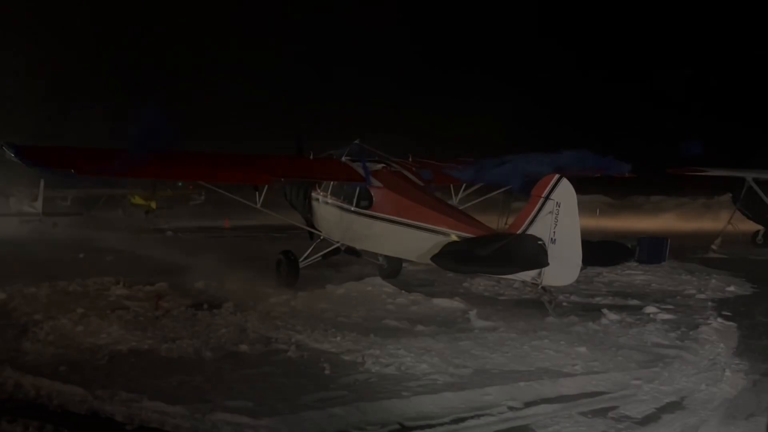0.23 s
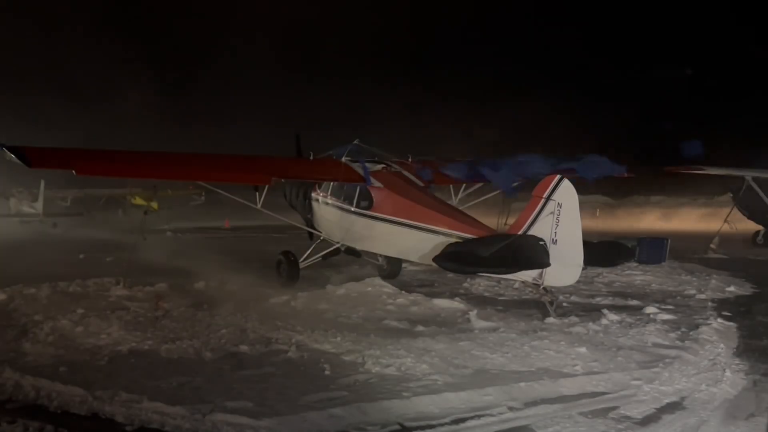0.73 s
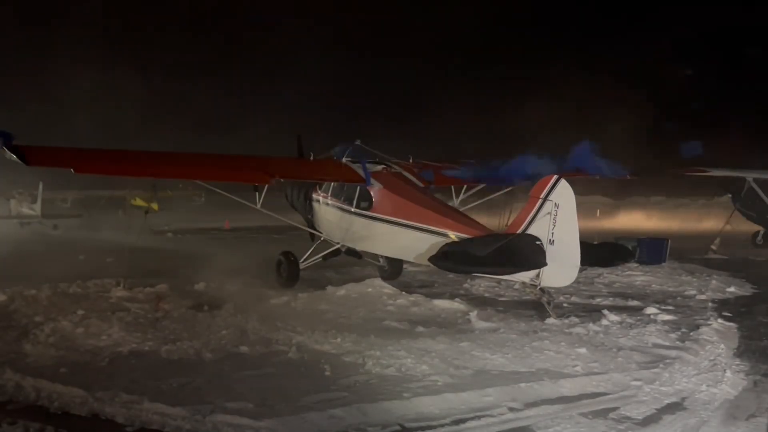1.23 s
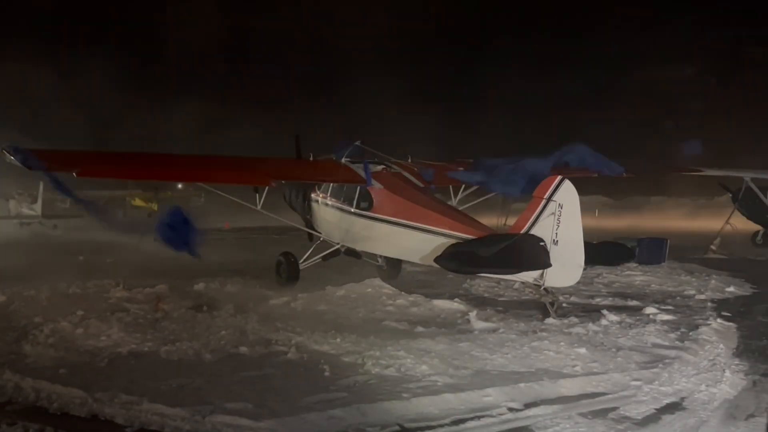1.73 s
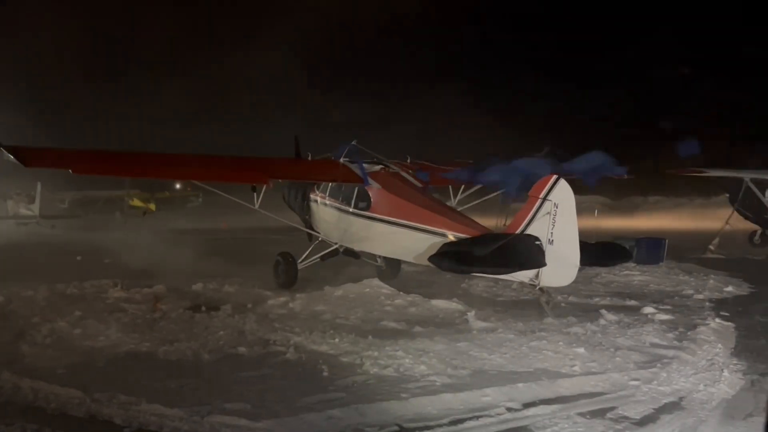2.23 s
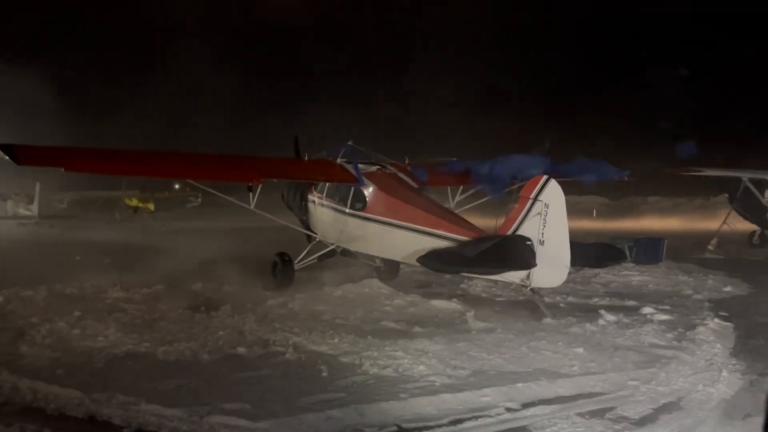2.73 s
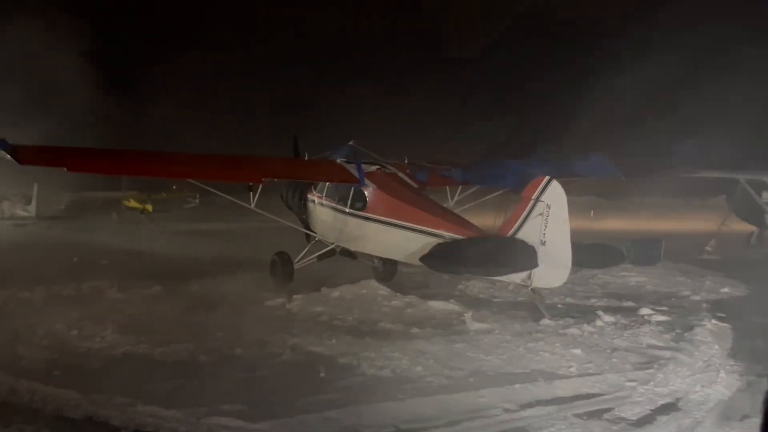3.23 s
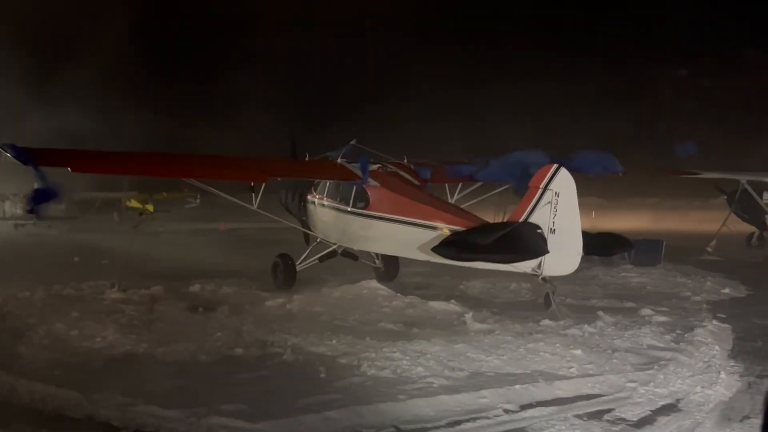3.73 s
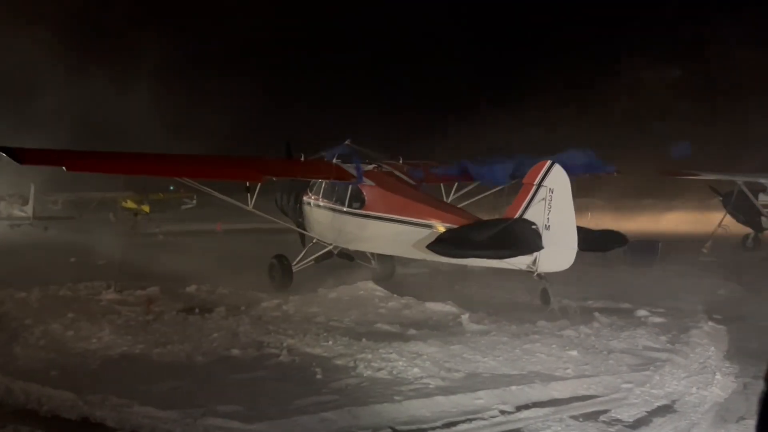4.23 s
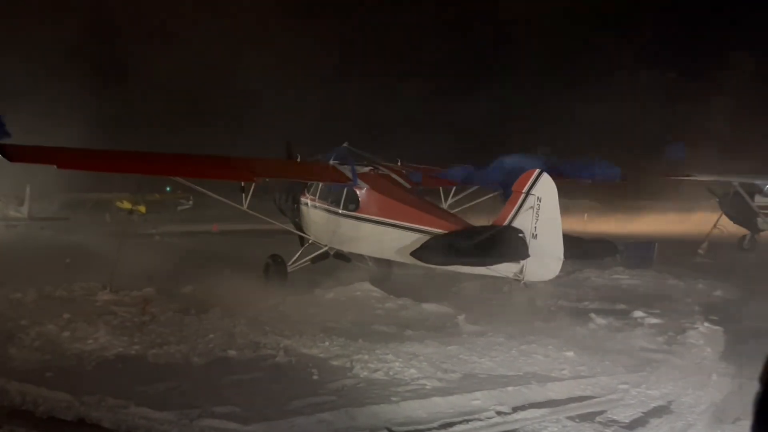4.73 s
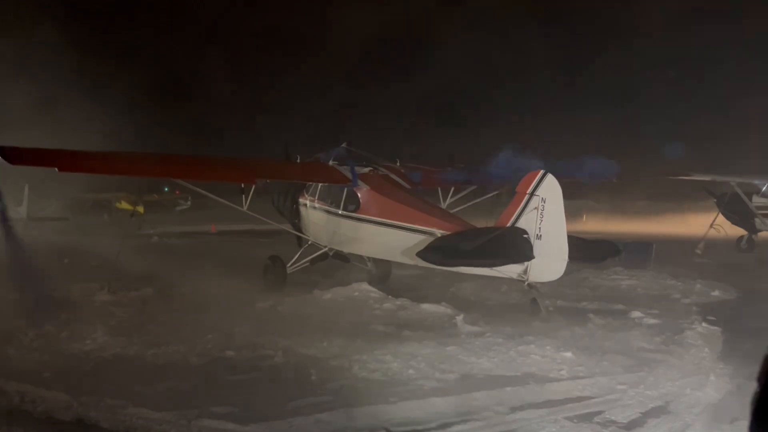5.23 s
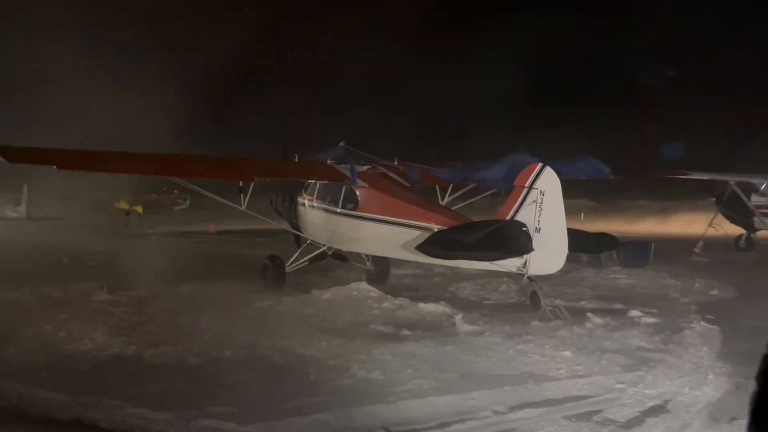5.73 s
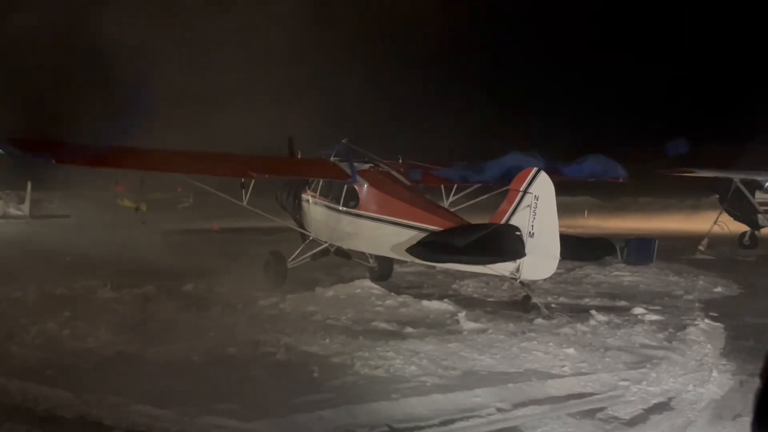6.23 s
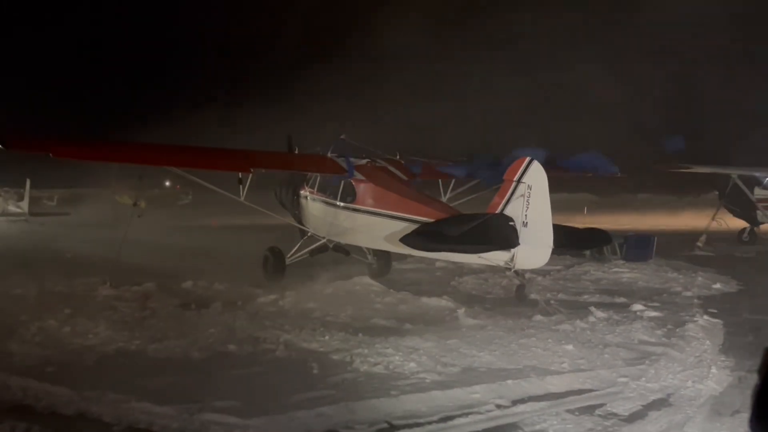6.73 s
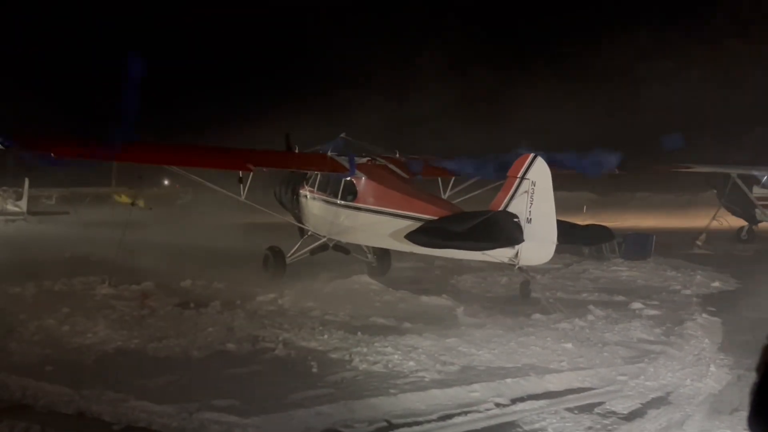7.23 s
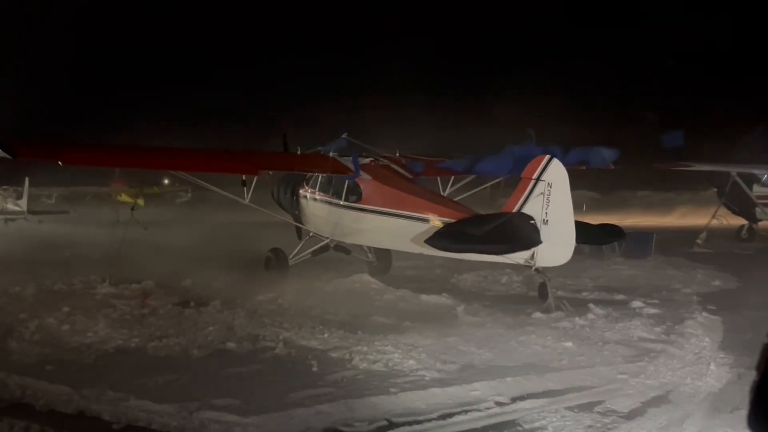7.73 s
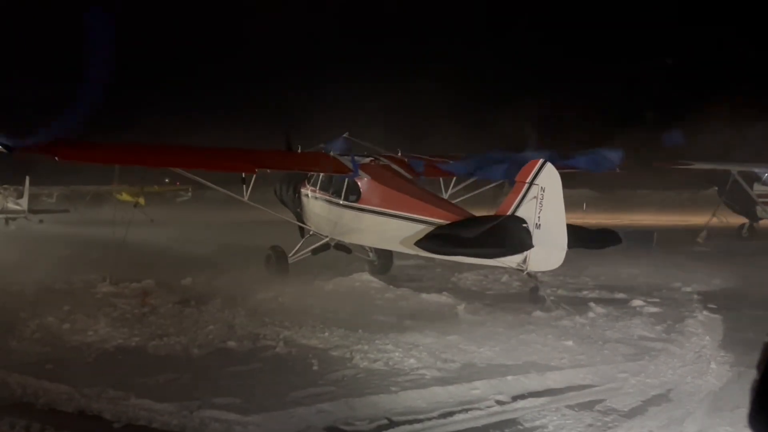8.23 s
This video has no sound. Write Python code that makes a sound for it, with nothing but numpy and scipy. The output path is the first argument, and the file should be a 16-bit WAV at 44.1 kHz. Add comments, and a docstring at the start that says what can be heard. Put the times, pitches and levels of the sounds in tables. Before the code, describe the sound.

From silence, the sound rises over about the first second into a strong gale blowing directly on a hand-held stereo microphone at a snowy airfield. Deep, irregular rumbling and quick fluttering thumps dominate, differing slightly left and right, over a mid-low roar and thin airy hiss. Until about 3 s there is mostly wind, with barely audible snow puffs. From 3.2 s grains spray lightly on the housing; gusts strengthen around 4.3 and 5.1 s. At 5.2 s small ticks and a crisp crack arrive, another sharp snap at 5.8 s, then soft crumbling crunches from 6 s. Around 6.75 to 6.85 s come the hardest ice cracks, in a tight cluster, with a surge of dense hissing snow. From 7.2 s crunchy clumps, bright ticks and spraying grains crowd together, a snap at 7.5 s, heavier crunches at 8.0 and 8.3 s, ending abruptly at 8.5 s amid swelling wind.

```python
"""A gale blows over a snowy airfield and straight onto a hand-held microphone.
Eddies buffet its two ports over the roar and hiss of the open field: coloured noise that swells with the gusts.
Drifting snow builds to a dense hiss on the housing, noise and random grains in swirls. Bursts of tiny contacts
make ice pellets tick, puffs of grains spray, soft clumps crunch and crumble, and hard chips snap and knock."""
import sys
import numpy as np
from scipy import signal
from scipy.fft import rfft, irfft
from scipy.io import wavfile
from scipy.ndimage import uniform_filter1d

SR = 44100
rng = np.random.default_rng(int(sys.argv[2]) if len(sys.argv) > 2 else 0)


def transcribe(signal):
    """Save signal, clipped to [-1, 1], as a 16-bit WAV file at the path in sys.argv[1]."""
    frames = np.atleast_2d(signal).T
    limited = np.clip(frames, -1, 1)
    pcm = np.round(limited * 32767).astype(np.int16)
    wavfile.write(sys.argv[1], SR, pcm)


N = 374409
TIME, BINS = np.arange(N) / SR, np.fft.rfftfreq(N, 1 / SR)

# flow of snow against the housing: (time [s], level [dB])
SNOW_FLOW = [(0, -60.5), (1.1, -59.5), (1.3, -57), (1.36, -50), (1.88, -59.5), (1.96, -53), (3.12, -57.5),
             (3.2, -48.5), (3.42, -45.5), (3.56, -51.5), (4.25, -51.5), (4.33, -54), (4.58, -49),
             (4.76, -47), (5.15, -48), (5.35, -39.5), (5.52, -43.5), (5.8, -43.5), (5.89, -44.5),
             (6.0, -40.5), (6.22, -44.5), (6.4, -41.5), (6.54, -40.5), (6.68, -38.5), (6.92, -34.5),
             (7.08, -43.5), (7.31, -45), (7.42, -35.5), (7.62, -34), (7.86, -38), (7.92, -40.5),
             (8.12, -35.5), (8.49, -34.5)]
# relative colours of spraying grains, dull thuds and soft pushes: (frequency [Hz], level [dB])
GRAIN_COLOUR = [(200, -6), (900, 4.5), (1500, 3), (2200, 6), (3100, 0), (5500, -0.5), (6800, 1.5),
                (8100, 0.5), (9700, -12.5), (11700, -5.5), (14000, -2), (15600, 0)]
THUD_COLOUR = [(80, -12.5), (500, 2), (1100, -7), (1600, -0.5), (2250, -1), (2650, -4), (2950, -8.5),
               (4000, -16.5), (9000, -29)]
PUSH_COLOUR = [(60, -19.5), (350, 1), (600, 0.5), (1000, -7), (3000, -45.5)]


def gain_of(db):
    """Decibels to amplitude."""
    return np.exp(np.asarray(db) * (np.log(10) / 20))


def evened(x):
    """Scales to unit rms."""
    return x / np.sqrt(np.mean(x ** 2) + 1e-20)


def read(points, hz):
    """Reads a spectrum table on a log-frequency axis."""
    f, value = np.transpose(points)
    return np.interp(np.log(hz + 1), np.log(f + 1), value)


def follow(points, s=TIME):
    """Reads a level curve at the given times, or at every sample."""
    return np.interp(s, *np.transpose(points))


def add(mix, s, sound):
    """Mixes a sound in at time s."""
    part = mix[round(s * SR):][:len(sound)]
    part += sound[:len(part)]


def flutter(hz, size=32):
    """Random wobble of about unit rms whose rates centre near hz."""
    t = TIME[::size]
    rate = np.fft.rfftfreq(len(t), size / SR) / hz
    spectrum = rfft(rng.standard_normal(len(t))) * rate / (1 + rate ** 3)
    return np.interp(TIME, t, evened(irfft(spectrum, len(t))))


def colour(x, points, size=4096):
    """Minimum-phase filter of unit energy, so sharp onsets stay sharp."""
    log_gain = np.log(gain_of(read(points, abs(np.fft.fftfreq(size, 1 / SR)))))
    response = np.exp(np.conj(signal.hilbert(log_gain)))
    taps = np.fft.ifft(response).real[:size // 2]
    return signal.oaconvolve(x, taps / np.linalg.norm(taps))[:N]


def air(points):
    """Turbulent pressure at two ports, only partly alike because small eddies do not cover both."""
    # likeness of the ports: (frequency [Hz], correlation [-1 to 1])
    port_likeness = [(40, .996), (70, .992), (140, .972), (250, .8), (500, .81), (1100, .6), (1800, .92),
                     (4000, .9)]
    left, other = rfft(rng.standard_normal((2, N)))
    same = np.clip(read(port_likeness, BINS), -1, 1)
    right = same * left + np.sqrt(1 - same ** 2) * other
    return evened(irfft(np.array([left, right]) * gain_of(read(points, BINS)), N))


def steadied(x, span=0.082, share=0.27):
    """Partly evens out a noise's own slow swells, so that the gust curve leads."""
    window = signal.windows.hann(int(2 * span * SR))
    power = signal.fftconvolve((x ** 2).mean(0), window, "same")
    return evened(x / (abs(power) + 1e-9) ** (share / 2))


def wind():
    """Turbulence buffets the ports, small eddies in shoves, over field noise that grows less with the gust."""
    # strength of the gale at the microphone: (time [s], level [dB])
    gust = [(0, -28.5), (0.6, -30), (0.85, -29), (1.0, -28), (1.3, -28), (1.52, -26), (1.65, -26.7),
            (1.9, -27), (2.35, -26.5), (2.55, -26), (2.8, -26), (2.95, -25.5), (3.05, -26.5), (3.14, -27.5),
            (3.24, -28), (3.45, -26), (3.7, -25), (3.9, -26), (4.3, -23.5), (4.6, -25.5), (4.9, -25),
            (5.1, -23), (5.55, -23.5), (5.85, -24.5), (6.2, -26.5), (6.7, -25), (6.9, -23.5), (7.2, -26),
            (7.45, -25), (7.75, -23), (7.83, -25), (7.97, -23.5), (8.1, -25.5), (8.22, -26), (8.49, -23)]
    # relative colours of each layer: (frequency [Hz], level [dB])
    large_colour = [(15, -47), (24, -34), (31, 1), (39, 3), (62, 7.5), (85, 1.5), (120, -8.5), (250, -93)]
    small_colour = [(50, -40), (90, -4.5), (130, 2.5), (180, -2), (260, -6.5), (400, -17), (700, -26),
                    (1500, -37.5), (4000, -86)]
    roar_colour = [(100, -5.5), (300, 2), (430, -1), (560, 2.5), (750, -6.5), (980, -11), (1080, -10.5),
                   (1180, -13), (1420, -11), (1650, -15), (2000, -20), (2650, -29), (3050, -27),
                   (4000, -38.5), (5500, -36), (8000, -58)]
    hiss_colour = [(800, -33), (1200, -1), (1400, 3), (1650, 0.5), (2000, -6.5), (2720, -10.5), (2950, -26),
                   (4500, -50)]
    gale_db = -25  # the gust strength at which each layer sits at its base level
    gust_db = follow(gust) - gale_db
    shove = flutter(hz=19.9)
    # base level [dB], then dB gained per dB of gust, then depth of the wobble [dB]
    large = steadied(air(large_colour)) * gain_of(-25 + 1.24 * gust_db + 1.3 * flutter(hz=5.0))
    small = steadied(air(small_colour)) * gain_of(-25 + 1.24 * gust_db + 0.91 * shove)
    roar = air(roar_colour) * gain_of(-34.5 + 0.53 * gust_db + 0.55 * shove)
    hiss = air(hiss_colour) * gain_of(-48.5 + 0.21 * gust_db + 1.2 * flutter(hz=14))
    return large + small + roar + hiss


def drift(grains_per_s=200, full_flow_db=-40):
    """Powder hisses in swirls, grains crackle and grow ragged with the flow, and coarse snow rushes lower."""
    # coarse snow that the gusts lift off the ground: (time [s], level [dB])
    coarse_flow = [(0, -72), (1.5, -55), (2.1, -55), (2.7, -52.5), (2.85, -49), (3.05, -58), (3.3, -50.5),
                   (3.65, -52.5), (4.05, -49.5), (4.3, -46), (4.55, -48.5), (4.75, -48.5), (5.4, -44.5),
                   (6.22, -49), (6.4, -56), (6.9, -37.5), (7.1, -48.5), (7.6, -40.5), (7.85, -43),
                   (8.49, -39)]
    flow_db = follow(SNOW_FLOW)
    strength = np.minimum(gain_of(0.98 * (flow_db - full_flow_db)), 1)
    swirl_db = 2.2 * flutter(hz=12)
    ragged = gain_of(strength * 2.16 * flutter(hz=54.3) + swirl_db)

    # sparse clicks of random polarity; a few are much louder than the rest
    clicks = (rng.random(N) < grains_per_s / SR) * rng.choice([-1, 1], N)
    grains = evened(clicks * gain_of(4.5 * np.minimum(rng.exponential(1, N), 4)))
    hiss = gain_of(-4.0) * rng.standard_normal(N)
    crackle = gain_of(-12.5) * strength * grains
    powder = gain_of(flow_db) * (hiss + crackle)
    coarse = rng.standard_normal(N) * gain_of(follow(coarse_flow) + 0.96 * flutter(hz=25))
    return colour(ragged * powder, GRAIN_COLOUR) + colour(ragged * coarse, THUD_COLOUR)


def burst(decay, rise, grain_db, lumps_db=0):
    """A shower of tiny contacts that starts fast and thins out, perhaps in lumps."""
    t = TIME[:SR // 4]
    lumps = evened(uniform_filter1d(rng.standard_normal(len(t)), size=90))
    unevenness_db = grain_db * rng.standard_normal(len(t)) + lumps_db * lumps
    contacts = evened(rng.standard_normal(len(t)) * gain_of(unevenness_db))
    return contacts * (1 - np.exp(-t / max(rise, 1e-5))) * np.exp(-t / max(decay, 1e-4))


def pitched(x, hz, width_hz, ring_db):
    """A one-pole resonance lifts the band around hz in a blow."""
    r = np.exp(-np.pi * width_hz / SR)
    ring = 2 * signal.lfilter([1 - r], [1, -r * np.exp(2j * np.pi * hz / SR)], x).real
    return x + gain_of(ring_db) * ring


def stray_pellets(count=70, over_flow_db=12.5, spread_db=3):
    """Small pellets land at random, as loud as the flow allows: (time [s], level [dB], band [Hz])."""
    when, size, pitch = rng.random((count, 3)).T
    s = when * TIME[-1]
    db = follow(SNOW_FLOW, s) + over_flow_db + spread_db * (2 * size - 1)
    return list(zip(s, db, 3200 + 5500 * pitch))


def pellets():
    """Ice pellets tick: very short bursts of contacts, each strongest in its own band."""
    # single pellets: (time [s], relative level [dB], strongest band [Hz])
    single_pellets = [(3.824, -34, 5500), (5.2086, -23, 7500), (5.281, -23, 6000), (5.313, -33, 7300),
                      (5.669, -25, 7000), (5.779, -18, 7100), (6.4153, -16.5, 7700), (6.445, -18, 7300),
                      (6.667, -23, 6000), (6.7767, -14, 3200), (6.858, -19, 9000), (7.3834, -11, 3770),
                      (7.497, -13, 7640), (7.5195, -31, 6200), (7.707, -10.5, 8450), (7.714, -13.5, 7090),
                      (7.7511, -12, 3180), (7.8247, -11, 6660), (7.9267, -20, 6500), (8.0977, -17, 3810),
                      (8.211, -20, 3300), (8.24, -15, 6550), (8.253, -8.5, 6330)]
    # relative colour of ice: (frequency [Hz], level [dB])
    ice_colour = [(200, -48), (1000, 0.5), (2000, 0), (3100, 3.5), (4500, 3.5), (7500, 5), (9700, -0.5),
                  (12000, 4.5), (16000, 2)]
    ticks = np.zeros(N)
    for s, db, hz in list(single_pellets) + stray_pellets():
        tick = burst(decay=0.0029, rise=0.00036, grain_db=2.5)
        add(ticks, s, gain_of(db - 9.5) * pitched(tick, hz, width_hz=520, ring_db=4.5))
    return colour(ticks, ice_colour)


def puffs():
    """Puffs of fine grains spray over the housing: soft-edged bursts of even contacts."""
    # puffs: (time [s], relative level [dB])
    puff_rows = [(0.6305, -36.5), (1.09, -42), (2.1695, -46), (2.351, -31), (2.7023, -37), (3.16, -31),
                 (3.247, -27.5), (3.474, -20), (3.6416, -34), (3.824, -30), (4.1245, -33.5), (4.367, -23.5),
                 (4.416, -23), (4.893, -22.5), (5.0333, -26), (5.189, -20), (5.2, -24), (5.745, -23),
                 (5.9785, -22.5), (6.118, -26), (6.163, -21.5), (6.484, -19), (7.158, -25), (7.249, -21.5),
                 (7.853, -15.5)]
    spray = np.zeros(N)
    for s, db in puff_rows:
        add(spray, s, gain_of(db - 11.0) * burst(decay=0.015, rise=0.0017, grain_db=0.5))
    return colour(spray, GRAIN_COLOUR)


def clumps():
    """Snow clumps crunch in lumpy bursts with spray, rustling crumbs and a soft push as they flatten."""
    # clumps: (time [s], relative level [dB], spray trim [dB], push trim [dB],
    #          crunch rise [s], crunch decay [s], strongest band [Hz])
    clump_rows = [(3.252, -40.5, -7, -4, 0.0039, 0.023, 2500), (4.1243, -39, -9, 0, .002, 0.015, 2450),
                  (5.199, -28.5, -11, -4, 0.0018, 0.027, 2700), (5.381, -32.5, -8, -3, .003, 0.013, 2900),
                  (5.402, -31, -7, -5, 0.0024, 0.014, 2000),
                  (5.5736, -23.5, -11, -4.5, 0.0026, 0.017, 1690),
                  (6.003, -32, -12, -20, .003, 0.026, 2270), (6.2511, -27.5, -8, -4, 0.0026, 0.032, 2500),
                  (6.348, -34, -9, -4, 0.0027, 0.067, 2080), (6.428, -30.5, -5, -6, .003, 0.026, 2100),
                  (6.563, -16, -20, -14.5, .006, 0.02, 1930), (6.8146, -29.5, -21, -15, .003, 0.029, 2150),
                  (7.1884, -13.5, -14.5, -13, .0008, 0.013, 1850),
                  (7.3313, -23.5, -15.5, -18, 0.0009, 0.0081, 1980),
                  (7.477, -23, -15, -3.5, .002, 0.015, 1990), (7.5564, -23, -13, -15, 0.0024, 0.022, 2190),
                  (7.629, -28, -11.5, -5, .003, 0.038, 1990), (7.731, -28.5, -9, -4, 0.0022, 0.023, 2000),
                  (8.0074, -13.5, -15.5, -10, 0.0024, 0.025, 2150),
                  (8.147, -32.5, -3, -0.5, .002, 0.012, 2100),
                  (8.3167, -14.5, -8, -5.5, 0.00092, 0.014, 2430), (8.343, -34, -18, 6, .002, 0.017, 2200),
                  (8.431, -36.5, -1, -12, .001, 0.0057, 2100)]
    lumps_db, push_delay_s = 2.5, 0.00501
    thud, spray, push = np.zeros((3, N))
    for s, db, spray_db, push_db, rise, decay, hz in clump_rows:
        crunch = burst(decay, rise, grain_db=5.0, lumps_db=lumps_db)
        # the crumbs rustle on after the clump
        crumbs = gain_of(-21) * burst(decay=0.048, rise=decay, grain_db=3.5)
        blow = pitched(crunch + crumbs, hz, width_hz=800, ring_db=4)
        add(thud, s, gain_of(db - 7.5) * blow)

        grains = burst(decay * 0.77, rise, grain_db=-2.5, lumps_db=lumps_db)
        add(spray, s, gain_of(db + spray_db + 9.5) * grains)

        flattening = burst(decay * 1.5, rise=0.0016, grain_db=4.0)
        add(push, s + push_delay_s, gain_of(db + push_db + 2.0) * flattening)
    return colour(thud, THUD_COLOUR) + colour(spray, GRAIN_COLOUR) + colour(push, PUSH_COLOUR)


def chips():
    """Hard chips of ice crack brightly, knock with a very short ring and give a low push."""
    # chips: (time [s], relative crack level [dB], brightest crack band [Hz],
    #         knock level [dB], knock frequency [Hz], push level [dB])
    chip_rows = [(5.2356, -10.5, 3900, -11.5, 2100, -26), (5.7938, -1.5, 7900, -10, 2400, -33),
                 (6.7582, 1, 9000, -7.5, 1900, -23.5), (6.7831, -8.5, 3300, -26, 2200, -30),
                 (6.842, -8.5, 3800, -17, 2270, -30), (7.5355, -11, 3700, -16, 2000, -30)]
    # relative colour of the crack: (frequency [Hz], level [dB])
    crack_colour = [(300, -40), (1500, -27), (2600, 0), (3900, 5.5), (5500, 4.5), (8000, 6), (9700, -2),
                    (12000, 4), (16000, -3.5)]
    t = TIME[:SR // 50]
    knock_shape = (1 - np.exp(-t / 0.00027)) * np.exp(-t / 0.0009)  # rise and decay [s]
    crack, knock, push = np.zeros((3, N))
    for s, db, crack_hz, knock_db, knock_hz, push_db in chip_rows:
        snap = burst(decay=0.0025, rise=0.00013, grain_db=7.0)
        add(crack, s, gain_of(db - 11.5) * pitched(snap, crack_hz, width_hz=470, ring_db=-3.5))
        add(knock, s, gain_of(knock_db) * knock_shape * np.sin(2 * np.pi * knock_hz * t))
        add(push, s, gain_of(push_db) * burst(decay=0.0099, rise=0.0008, grain_db=0.0))
    return colour(crack, crack_colour) + knock + colour(push, PUSH_COLOUR)


def housing(x):
    """Whatever strikes the housing also rings its modes, decaying cosines."""
    # modes: (frequency [Hz], width [Hz], gain over the direct sound [dB])
    modes = [(1477, 32, 2), (1878, 28, 2.5), (2055, 24, 3), (2227, 45, 1.5), (2480, 50, -7), (2750, 60, -6),
             (3780, 80, -6), (4490, 60, -5), (6520, 110, -5), (11677, 200, 0)]
    t = TIME[:SR // 8]
    ring = np.zeros(len(t))
    for hz, width, db in modes:
        strength = gain_of(db) * 2 * np.pi * width / SR
        ring += strength * np.exp(-np.pi * width * t) * np.cos(2 * np.pi * hz * t)
    return x + signal.oaconvolve(x, ring)[:N]


def snow():
    """All the snow and ice that strikes: drift, pellets, puffs, clumps and chips."""
    return drift() + pellets() + puffs() + clumps() + chips()


def one_port_snow():
    """Each port gets its own random grains on the same curves and times, which widens the snow."""
    # relative colour of the snow at one port: (frequency [Hz], level [dB])
    one_port_colour = [(400, -6), (1100, 0), (2000, -9), (4000, 1), (7000, 0), (14000, 1)]
    return gain_of(-9.5) * np.array([colour(snow(), one_port_colour) for _ in range(2)])


def scene():
    """Wind at the ports, snow heard through the housing at both, and grains heard at one port only."""
    return wind() + housing(snow()) + one_port_snow()


def port_pair(dry):
    """The path through the housing sets level and phase apart between the two ports."""
    # left over right: (frequency [Hz], level [dB])
    balance = [(60, .3), (125, 1.2), (250, 3.5), (500, .5), (1150, 3), (1700, .2), (8000, .3)]
    # phase by which left leads: (frequency [Hz], phase [rad])
    lead = [(100, 0), (400, -.3), (1150, -.5), (2000, 0), (3300, .7), (5200, .3), (5800, -.35), (7200, 0),
            (8500, -1.1), (9300, -2.8), (10200, -3.2), (13200, -6.1), (14000, -6.5), (15800, -8.6)]
    side, hz = np.array([[1], [-1]]) / 2, np.fft.rfftfreq(2 * N, 1 / SR)
    ports = gain_of(side * read(balance, hz)) * np.exp(1j * side * read(lead, hz))
    return irfft(rfft(dry, 2 * N) * ports)[:, :N]


def fade_in(start_s=0.036, length_s=0.91):
    """The sound rises evenly out of silence."""
    return np.clip((TIME - start_s) / length_s, 0, 1)


def record(dry, bass_hz=30, ceiling=0.78, edge_hz=15850):
    """After the port pair, deep bass rolls off and peaks are rounded; then the fade-in and a treble limit."""
    heard = port_pair(dry)
    high_pass = signal.butter(6, bass_hz, "high", fs=SR, output="sos")
    heard = signal.sosfilt(high_pass, heard)
    rounded = heard / (1 + (heard / ceiling) ** 4) ** (1 / 4)
    low_pass = signal.firwin(511, edge_hz, window=("kaiser", 9), fs=SR)
    return signal.oaconvolve(rounded * fade_in(), low_pass[None], "same")


dry = scene()
out = record(dry)
transcribe(out)
```